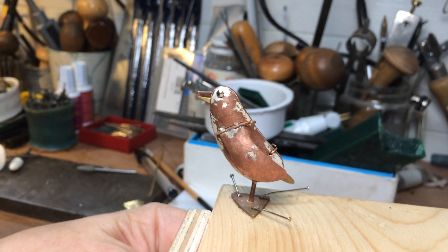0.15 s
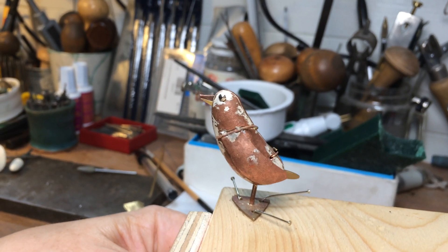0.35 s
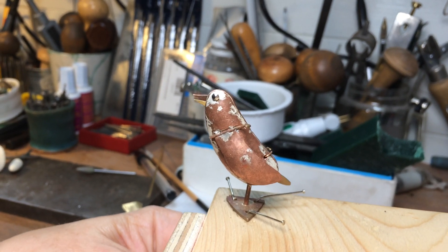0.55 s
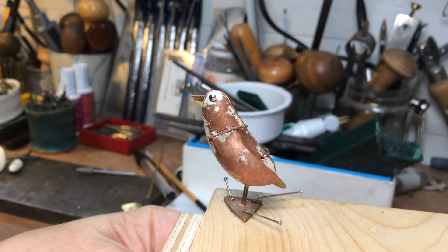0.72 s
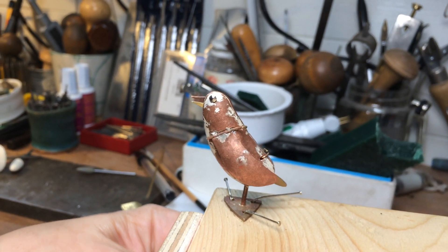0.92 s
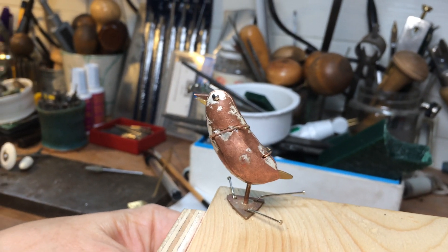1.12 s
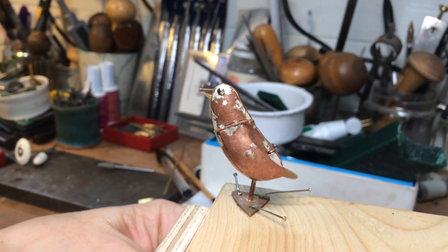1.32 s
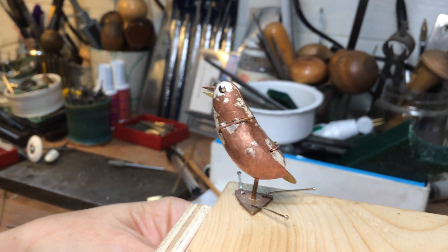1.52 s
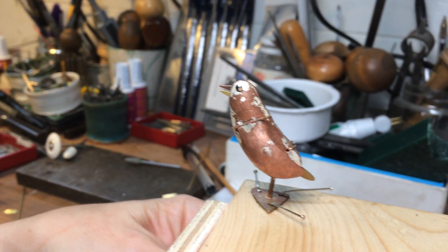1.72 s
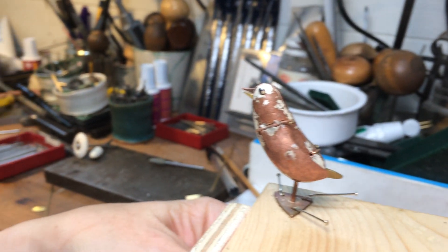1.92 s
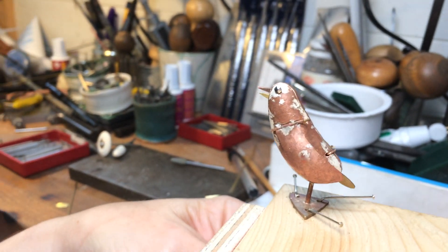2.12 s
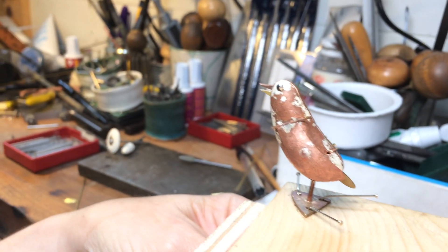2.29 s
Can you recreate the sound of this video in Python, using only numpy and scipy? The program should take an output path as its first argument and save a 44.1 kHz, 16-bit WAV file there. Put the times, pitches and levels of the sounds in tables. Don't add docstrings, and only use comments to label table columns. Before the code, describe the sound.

Sharp metallic clicks from a small hand-cranked copper bird on a wooden box, in a quiet workshop

```python
import sys
import numpy as np
from scipy import signal
from scipy.io import wavfile
from scipy.ndimage import uniform_filter1d

SR = 44100
rng = np.random.default_rng(int(sys.argv[2]) if len(sys.argv) > 2 else 0)


def store_wav(level_fs):
    pcm = np.round(np.clip(np.atleast_2d(level_fs), -1, 1) * 32767)
    wavfile.write(sys.argv[1], SR, pcm.T.astype(np.int16))


def voltage_ratio(level):
    return 10 ** (np.asarray(level, float) / 20)


N = 103635

# (frequency [Hz], level [dB per Hz])
HUSH = [(15, -36), (25, -11), (53, 3), (80, -2.5), (214, -11), (245, -14.5), (1180, -22), (14800, -34),
        (16500, -59.5)]
# (time [s], change [dB])
HAND_SHIFTS = [(0, 0), (.15, -1), (.3, 2), (.5, 2), (.75, -0.5), (1.0, 0.5), (1.2, -1.5), (1.399, 0),
               (1.65, -1), (1.85, -2.5), (2.05, 0), (2.25, 4.5), (2.35, 1)]
# (time [s], level [dB], extra level of the lower tones [dB])
WIRE_TICKS = [(.173, -65, 5), (.348, -49.5, -2), (.3515, -47.5, 4), (.362, -43, -0.5), (.3695, -43, -5),
              (.3785, -49.5, -9), (0.385, -58.5, -1), (.4045, -44.5, -25), (.4127, -41, -23),
              (0.5995, -67, 14), (.6077, -45.5, -1.5), (0.613, -63, -6), (.6252, -51.5, -0.5),
              (.784, -59, 3), (0.819, -61, 0), (1.036, -60, 3), (1.0475, -44, 1.5), (1.0507, -40, 4),
              (1.1292, -53, -20), (1.239, -46, -3.5), (1.439, -55, 3), (1.447, -44.5, -6), (1.4616, -48, 2),
              (1.534, -55, 5), (1.8215, -60, -25), (1.827, -43.5, 9.5), (1.8819, -47, -6),
              (1.9039, -45, -18), (2.1668, -57, 4.5), (2.18, -57, 6)]
# (frequency [Hz], level [dB], time to fade by 60 dB [s])
WIRE_TONES = [(6610, 6, 0.0066), (8160, 14, 0.0021), (9190, 7, 0.0026), (11600, 7, 0.0025),
              (13100, 7.5, 0.0018), (14600, -7.5, .007)]
# (frequency [Hz], time to fade by 60 dB [s])
ROOM_FADE = [(300, 0.12), (1000, 0.13), (4000, 0.095), (12000, 0.095)]
# (time [s], knock level [dB], knock pitch [Hz], thud level [dB])
HAND_BUMPS = [(.2036, -23.5, 756, -44), (0.2057, -27.5, 335.6, -62.5), (0.2101, -13.5, 665, -39.5),
              (.2180, -28.5, 598, -55.5), (.2245, -41, 676, -45), (.321, -43.5, 375, -51),
              (.5765, -42, 620, -46.5), (.6, -77, 495, -58), (.798, -52.5, 778, -58.5),
              (.893, -42, 518, -45.5), (.909, -57.5, 310, -43.5), (.95, -56, 650, -73),
              (1.012, -49.5, 505, -53.5), (1.053, -38.5, 320, -43.5), (1.52, -57, 250.5, -52),
              (1.76, -52, 636, -51), (1.828, -42.5, 334, -52), (1.91, -59, 340, -56.5),
              (2.272, -36.5, 488, -54)]
# (frequency [Hz], level [dB], time to fade by 60 dB [s])
THUD_TONES = [(58, -7, 0.16), (91.7, 4.5, 0.13), (136.7, 4.5, 0.091)]
# (start [s], length [s], shell level [dB], hiss level [dB])
CAM_SCRAPES = [(.325, 0.067, -58.5, -66.5), (0.409, 0.02, -37.5, -73), (0.574, 0.061, -61.5, -71.5),
               (0.201, .016, -54.5, -80), (0.708, 0.11, -67, -80.5), (1.019, 0.035, -65, -76.5),
               (1.124, 0.011, -40, -65), (1.236, 0.027, -69, -64.5), (1.429, 0.048, -62, -71.5),
               (1.797, 0.0355, -60, -81.5), (1.81, .011, -53, -80), (1.884, 0.0038, -60, -64),
               (1.8941, 0.014, -36, -76.5), (2.129, 0.08, -66.5, -77.5), (2.229, 0.038, -63.5, -70),
               (2.336, .015, -78, -72)]
# (frequency [Hz], level [dB], time to fade by 60 dB [s])
SHELL_TONES = [(1051.5, -6.5, 0.0077), (1436, -11, 0.011), (1562, -14.5, 0.011), (2180, -3.5, 0.004),
               (2408, -8, 0.011), (2587, -11.5, 0.012), (3167, 4, 0.0056), (2965, -18, .022),
               (3320, -14, 0.03), (3903, -12.5, 0.0093), (4680, -9.5, 0.0048), (5320, -26, 0.013),
               (5850, -17, .009), (6930, -25.5, 0.028)]
# (frequency [Hz], level [dB], time to fade by 60 dB [s])
RUBBED_SHELL_TONES = [(1210, -4.5, .012), (1537, 0.5, .014), (2450, -9.5, 0.013), (3330, -1.5, 0.0095)]
# (frequency [Hz], level [dB], time to fade by 60 dB [s])
BOX_TONES = [(320, -11, 0.05), (560, -7.5, 0.038), (650, -2.5, 0.026), (764, 7, 0.014), (882, 11.5, 0.0084),
             (1259, 4, 0.0097)]
# (multiple of the knock pitch [ratio], level [dB], time to fade by 60 dB [s])
KNOCK_TONES = [(.65, -6, 0.022), (.95, 4, 0.017), (1.12, -6, .022), (1.36, -12.5, 0.013),
               (1.6, -25.5, 0.025), (2.2, -14, 0.016)]
PART_TIMES = [.2112, .2125, .3425, .4168, .5995, .7595, .7600, 1.0465, 1.1335, 1.140, 1.4282, 1.4625,
              1.5322, 1.5335, 1.7595, 1.8215, 1.8955, 1.9085, 2.267, 2.3015]
# (level [dB], frequency [Hz])
PART_TONES = [(-40.5, 1000), (-50.5, 2700), (-43, 1700), (-42, 6850), (-57, 1530), (-49, 2450), (-69, 5500),
              (-43, 1450), (-33, 1450), (-41.5, 3050), (-49.5, 1500), (-46, 1480), (-53, 2400), (-43, 5400),
              (-58, 1520), (-37.5, 1300), (-37, 3400), (-36, 1500), (-52.5, 1740), (-59, 5000)]
# (time [s], shell level [dB], box level [dB])
LINKAGE_TAPS = [(0.3239, -45, -56), (0.3422, -35.5, -37.5), (.349, -42, -42.5), (0.404, -34, -50),
                (0.576, -92, -60), (0.583, -66, -56), (0.5991, -45.5, -42.5), (0.691, -54, -63),
                (0.76, -42, -55.5), (0.779, -54, -54), (1.0117, -76, -58.5), (1.036, -45, -46.5),
                (1.0461, -30, -36.5), (1.0512, -33, -34), (1.1199, -35, -47), (1.24, -55.5, -59.5),
                (1.4277, -56, -53.5), (1.4389, -53, -38.5), (1.4533, -47, -53.5), (1.4618, -48, -49),
                (1.4866, -51.5, -52), (1.508, -65, -57), (1.5314, -38, -57), (1.8104, -48, -63),
                (1.821, -28, -32), (1.8250, -42, -36.5), (1.8939, -36, -61), (2.118, -74, -62),
                (2.153, -70, -56), (2.1666, -49, -41.5), (2.199, -59, -55.5), (2.238, -57, -59),
                (2.267, -62, -58), (2.3013, -45.5, -54)]
# (time [s], level [dB], bounce level [dB], pitch [ratio])
BEAK_SNAPS = [
    (.4160, -15.5, -1.5, 1),
    (1.1330, -16.5, -5.5, 1.005),
    (1.9080, -19, -5.5, 1.03),
]
# (time [s], level [dB])
PLATE_PINGS = [(.5683, -65), (.5838, -57.5), (.691, -58.5), (.722, -72), (1.4030, -75), (1.4165, -59),
               (1.4235, -71.5), (1.4295, -55), (1.4385, -44.5), (1.4445, -62), (1.4525, -52), (1.4625, -55),
               (1.470, -68), (1.5068, -54.5), (1.5225, -60), (1.5318, -58), (1.8215, -33.5), (2.1273, -66),
               (2.147, -63), (2.154, -64), (2.1665, -48.5), (2.1986, -57), (2.2635, -63), (2.3012, -54)]
# (frequency [Hz], level [dB], time to fade by 60 dB [s])
PLATE_TONES = [(3250, 4.5, .012), (3266, 1.5, 0.015), (2620, -27, 0.017)]


def evened(x):
    return x / np.sqrt(np.mean(x ** 2) + 1e-20)


def read(points, hz):
    f, value = np.transpose(points)
    return np.interp(np.log(hz + 1), np.log(f + 1), value)


def passed(x, hz, kind, order=2):
    return signal.sosfilt(signal.butter(order, hz, kind, fs=SR, output="sos"), x)


def ring(drive, tones, rise_s, low_hz):
    t = np.arange(6000) / SR
    body = sum(voltage_ratio(db - 60 * t / t60) * np.sin(2 * np.pi * hz * t) for hz, db, t60 in tones)
    body = passed(body * (1 - np.exp(-t / rise_s)), low_hz, "high")
    return signal.oaconvolve(drive, body / abs(body).max())[:N]


def blows(times, levels_db, chatter_db, chatter_s):
    out, t = np.zeros(N + 600), np.arange(600) / SR
    pushes = rng.standard_normal((len(times), 600)) * voltage_ratio(chatter_db) * np.exp(-t / chatter_s)
    pushes[:, 0] = -1
    for s, db, push in zip(times, levels_db, pushes):
        out[round(s * SR):][:600] += voltage_ratio(db) * push
    return out[:N]


def air():
    frames, hz = N // 256 + 5, np.fft.rfftfreq(1024, 1 / SR)
    a, b, patches = rng.standard_normal((frames, 513, 3)).T
    patches = evened(uniform_filter1d(uniform_filter1d(patches, 12, 0), 10, 1))
    swell = evened(uniform_filter1d(rng.standard_normal(frames), 8))
    hands = np.interp(np.arange(frames) * 256 / SR, *np.transpose(HAND_SHIFTS))
    patch_db = patches * read([(100, 2.3), (1000, 2.0), (6000, .4)], hz)[:, None]
    swell_db = swell * read([(100, 0.83), (1000, 1.4), (9000, 0.5)], hz)[:, None]
    hands_db = hands * read([(60, 0.44), (300, 1.5), (2000, 1.4), (8000, .2)], hz)[:, None]
    z = (a + 1j * b) * voltage_ratio(read(HUSH, hz)[:, None] + patch_db + swell_db + hands_db)
    hush = signal.istft(z, nperseg=1024, noverlap=768)[1][:N]
    return voltage_ratio(-66) * evened(hush)


def wire(lower_drive, upper_drive):
    half = len(WIRE_TONES) // 2
    lower = ring(lower_drive, WIRE_TONES[:half], .00003, 2500)
    return lower + ring(upper_drive, WIRE_TONES[half:], .00003, 11000)


def ticks():
    s, db, lower_db = np.transpose(WIRE_TICKS)
    return wire(blows(s, db + lower_db, -14.5, 0.0022), blows(s, db, -19, 0.0021))


def room(x):
    echoes = np.zeros(SR // 2)
    at = np.arange(130, len(echoes) - 20, 20)
    echoes[at + rng.integers(0, 20, len(at))] = rng.choice([-1., 1.], len(at))
    hz, t, z = signal.stft(echoes, SR, nperseg=128)
    tail = signal.istft(z * voltage_ratio(-60 * t / read(ROOM_FADE, hz)[:, None]), SR, nperseg=128)[1]
    return signal.fftconvolve(x, tail / np.linalg.norm(tail))[:N]


def thuds():
    lead_s = 0.0063
    s, _, _, thud_db = np.transpose(HAND_BUMPS)
    push = passed(blows(s - lead_s, thud_db, -30, 0.0022), 150, "low")
    return ring(push, THUD_TONES, 0.0027, 25)


def slips(column):
    t, level = np.arange(N) / SR, np.zeros(N)
    for row in CAM_SCRAPES:
        u = t - row[0]
        level += voltage_ratio(row[column]) * np.clip(np.minimum(u / 0.0022, (row[1] - u) / .004 + 1), 0, 1)
    starts = rng.random(N) < 500 / SR
    sizes_db = 3.6 * np.minimum(rng.exponential(1, N), 3)
    grains = signal.lfilter([1], [1, -np.exp(-1 / (.0008 * SR))], starts * voltage_ratio(sizes_db))
    return level * (0.36 + 0.45 * grains) * rng.standard_normal(N)


def scrapes(slide):
    shell = ring(voltage_ratio(-19.5) * slide, SHELL_TONES, .00004, 780)
    rubbed = ring(voltage_ratio(-19.5) * slide, RUBBED_SHELL_TONES, .0001, 700)
    box = ring(voltage_ratio(-21.0) * slide, BOX_TONES, 0.0012, 360)
    hiss = voltage_ratio(-9.5) * slips(column=3)
    return shell + rubbed + box + wire(hiss, hiss)


def knocks():
    s, knock_db, knock_hz, _ = np.transpose(HAND_BUMPS)
    knock = np.zeros(N)
    for start, db, hz in zip(s, knock_db, knock_hz):
        push = passed(blows([start], [db], -23.5, 0.004), 4.1 * hz, "low")
        knock += ring(push, np.multiply(KNOCK_TONES, [hz, 1, 1]), 0.0014, 190)
    grit = passed(blows(s, knock_db - 46.0, 3.4, .005), 1400, "high")
    return knock + passed(grit, 4900, "low")


def parts():
    cycles = 30
    out, t = np.zeros(N), np.arange(2000) / SR
    for s, (db, hz) in zip(PART_TIMES, PART_TONES):
        fade = voltage_ratio(db - 60 * t * hz / cycles) * (1 - np.exp(-t / .0003))
        out[round(s * SR):][:2000] -= fade * np.sin(2 * np.pi * hz * t)
    return out


def shell_taps():
    s, shell_db, _ = np.transpose(LINKAGE_TAPS)
    return ring(blows(s, shell_db - 5.5, -11, 0.0037), SHELL_TONES, .00004, 780)


def box_taps():
    s, _, box_db = np.transpose(LINKAGE_TAPS)
    return ring(blows(s, box_db, -18.5, 0.0036), BOX_TONES, 0.0012, 360)


def beak_hits():
    s, db, bounce_db, _ = np.transpose(BEAK_SNAPS)
    times = np.r_[s, s + .0007, s + .0038]
    return blows(times, np.r_[db, db + 3.5, db + bounce_db], -21, .0012)


def snaps(hits):
    s, db, _, seat = np.transpose(BEAK_SNAPS)
    turn = np.searchsorted(s - .01, np.arange(N) / SR) - 1
    shell = sum(ring(hits * (turn == k), np.multiply(SHELL_TONES, [ratio, 1, 1]), .00004, 700)
                for k, ratio in enumerate(seat))
    box = ring(voltage_ratio(-14) * passed(hits, 610, "high"), BOX_TONES, 0.0012, 360)
    rattle = blows(s + .0007, db, -6.5, 0.0013) + blows(s + .0038, db - 30.0, 14, 0.0036)
    crack = voltage_ratio(-20.5) * (hits + rattle)
    return shell + box + wire(crack, crack) + voltage_ratio(-19.0) * passed(hits, 6000, "high")


def pings():
    s, db = np.transpose(PLATE_PINGS)
    return ring(blows(s, db, -30, 0.00079), PLATE_TONES, 0.00044, 1760)


def scene():
    knock, thud = knocks(), thuds()
    hits, slide = beak_hits(), slips(column=2)
    bird = parts() + shell_taps() + pings() + box_taps() + snaps(hits) + scrapes(slide) + ticks()
    near = bird + knock
    echo = voltage_ratio(-14.5) * room(passed(near, 4860, "low", order=1))
    return (near + echo + thud + air())[None]


def top_cut(x):
    return signal.sosfilt(signal.butter(12, 16650, fs=SR, output="sos"), x)


def record(dry):
    low_hz, top_hz = 45.08, 16250
    edge = signal.firwin(255, top_hz, window=("kaiser", 9), fs=SR)
    band = signal.oaconvolve(passed(dry, low_hz, "high", order=4), edge[None], "same")
    return top_cut(band)


dry = scene()
out = record(dry)
store_wav(out)
```